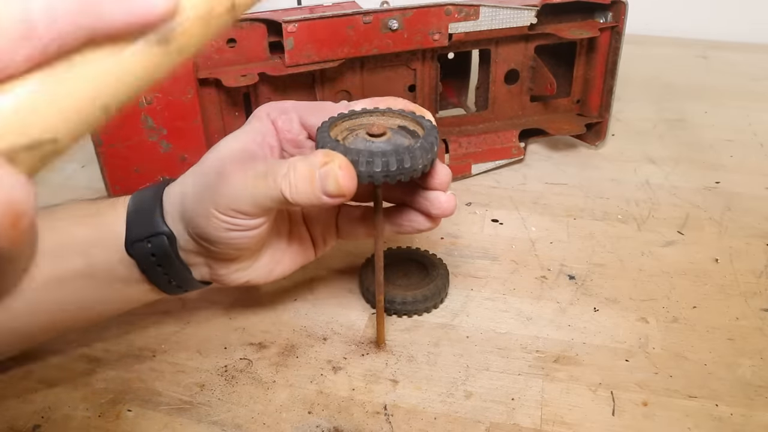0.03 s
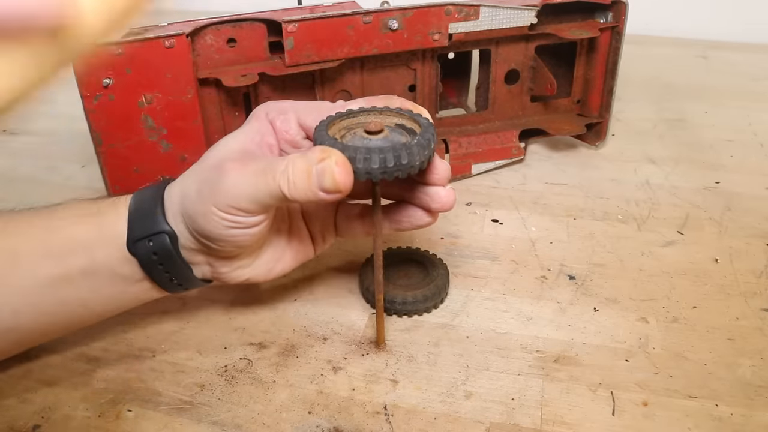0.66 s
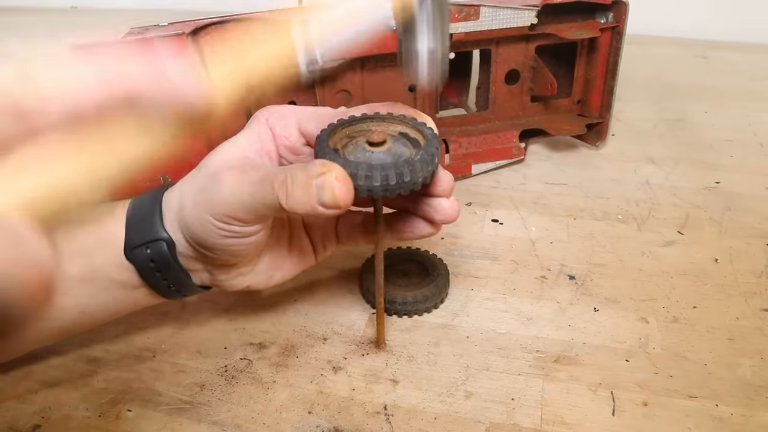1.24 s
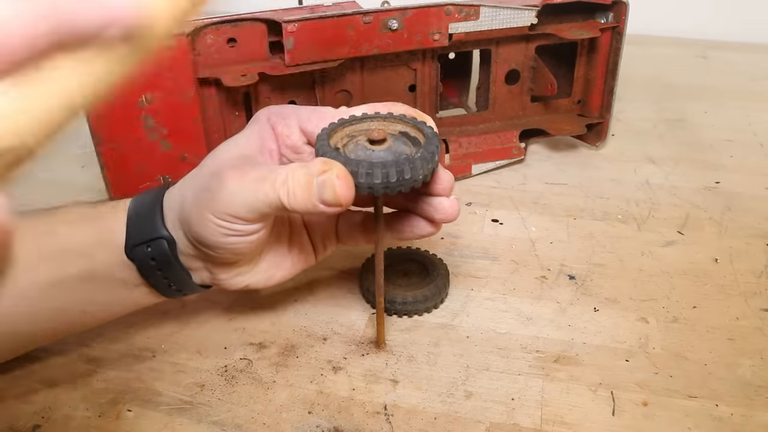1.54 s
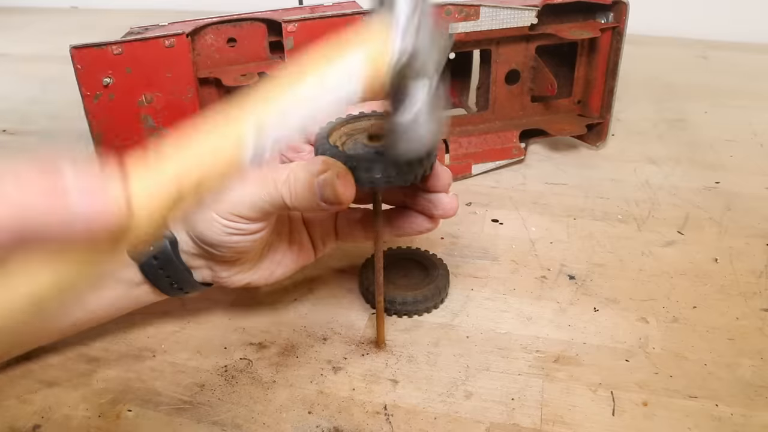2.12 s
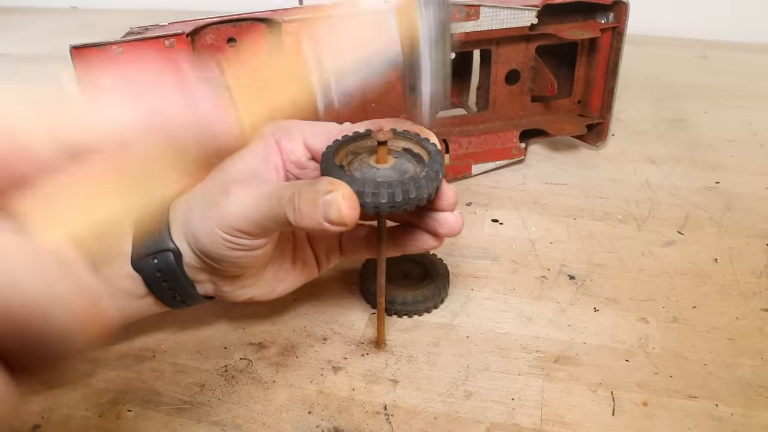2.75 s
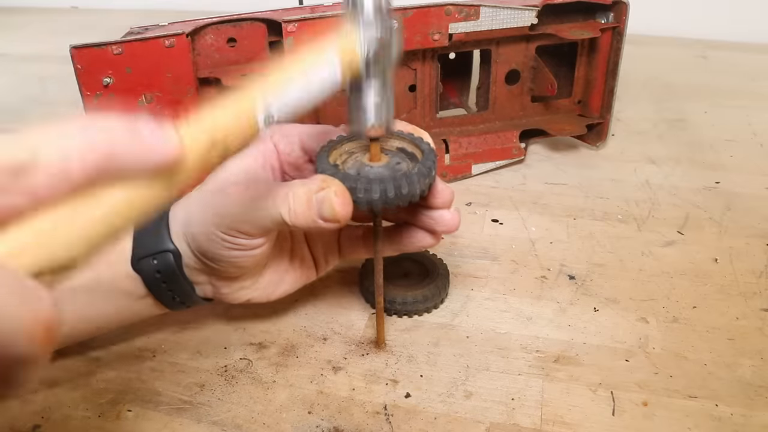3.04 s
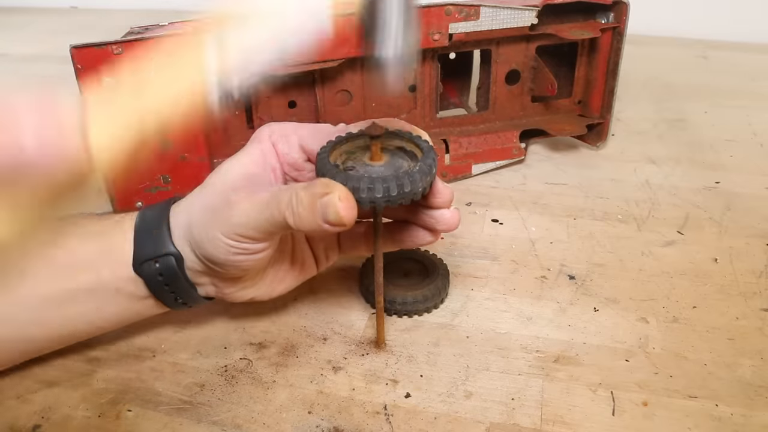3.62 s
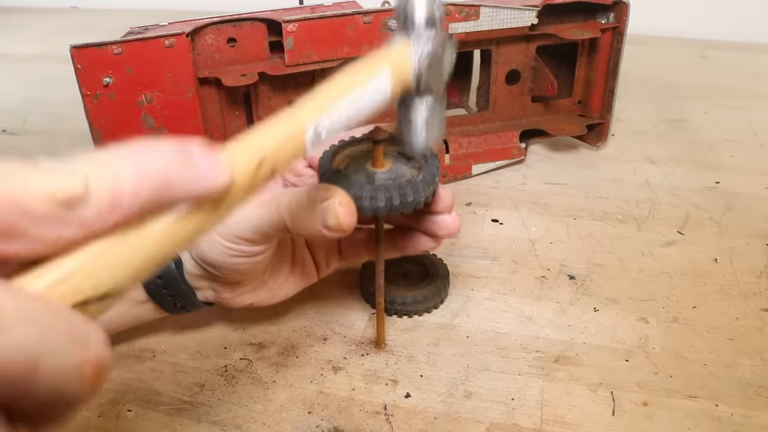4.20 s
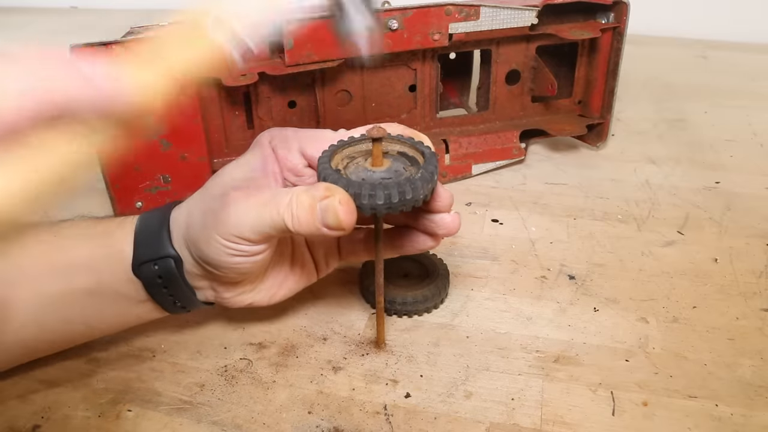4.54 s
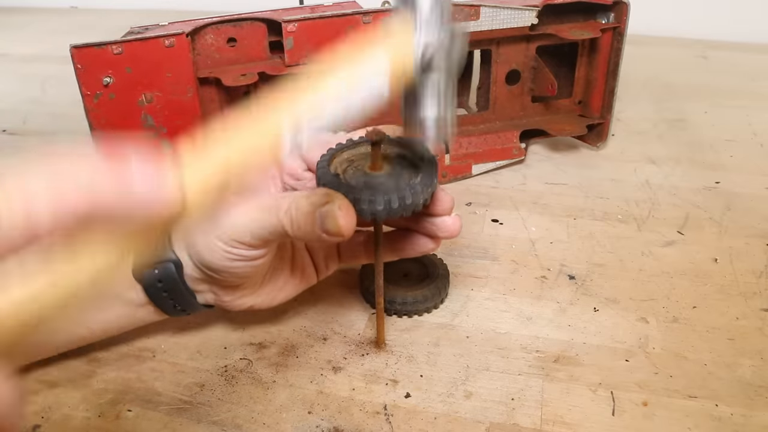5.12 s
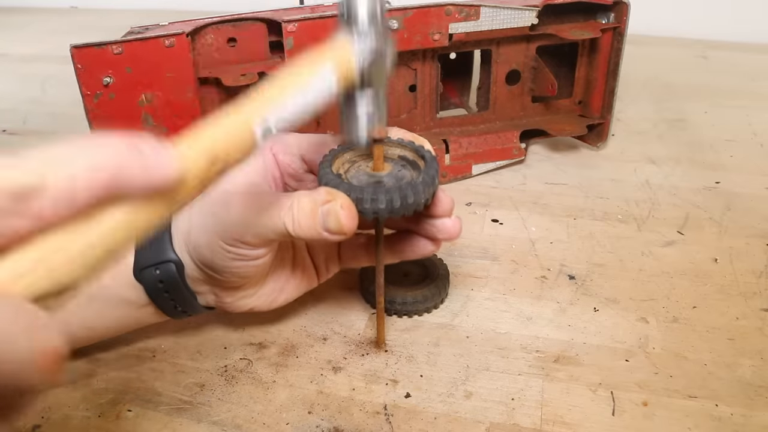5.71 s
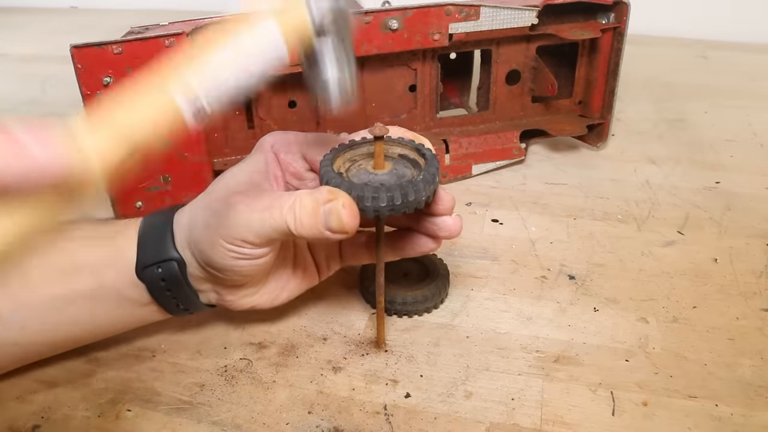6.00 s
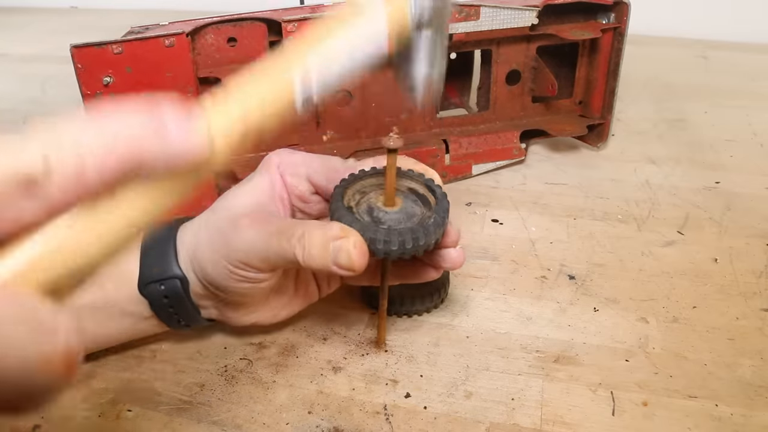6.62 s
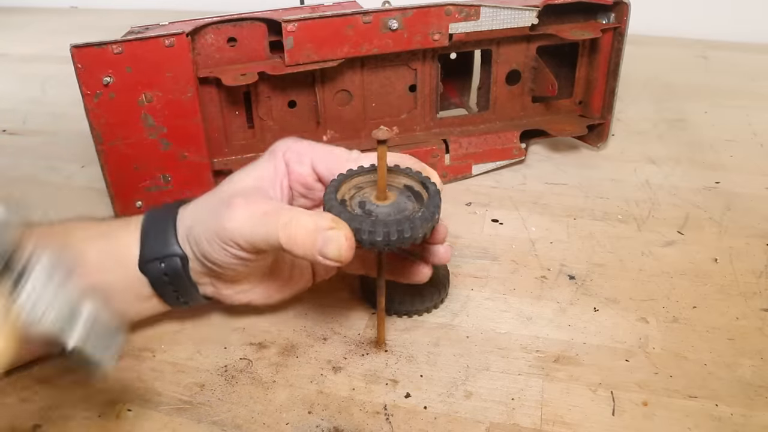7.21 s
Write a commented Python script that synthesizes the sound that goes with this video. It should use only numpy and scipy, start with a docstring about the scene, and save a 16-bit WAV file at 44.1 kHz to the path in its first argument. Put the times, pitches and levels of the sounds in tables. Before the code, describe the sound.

Quick, even hammer blows clack on a steel rod, each with a brief ring and a wooden knock in a small workshop.

```python
"""Steel clacks, about 4.5 a second: a small hammer taps a rusty axle through a hand-held toy wheel.
Each blow cracks on the rod's end, rings rod, wheel and hammer head, and knocks and sways the wooden
workbench under the axle. Strength, squareness and hardness of the contact set each blow's colour.
A small workshop answers over faint hiss; the two channels are almost unrelated."""
import sys
import numpy as np
from scipy import signal
from scipy.fft import rfft, irfft, next_fast_len
from scipy.io import wavfile
from scipy.ndimage import map_coordinates

SR = 44100
rng = np.random.default_rng(int(sys.argv[2]) if len(sys.argv) > 2 else 0)


def transcribe(signal):
    """Save signal, clipped to [-1, 1], as a 16-bit WAV file at the path in sys.argv[1]."""
    frames = np.atleast_2d(signal).T
    limited = np.clip(frames, -1, 1)
    pcm = np.round(limited * 32767).astype(np.int16)
    wavfile.write(sys.argv[1], SR, pcm)


N = 324135
LEAD = SR // 25  # samples before a blow's peak
T = (np.arange(2 ** 15) - LEAD) / SR  # one blow's time axis/s, peak at 0
GRID_HZ = np.arange(0, SR // 2, 40)

# Hammer blows: t/s, strength/dB, glance/dB (< 0 square, > 0 off-centre), contact hardness/dB
BLOWS = [(-0.095, -1, 3, 1.5), (0.1216, 1.5, -1, -1), (0.341, 0.7, -1.5, -1.5), (0.5602, 2, 1.5, -.5),
         (0.775, 2, 2, -1), (0.9924, .5, 2.5, -1.5), (1.1991, -0.4, 1, -3), (1.4166, -4, 4.5, -2),
         (1.6404, -1.5, 4.5, 4), (1.8745, -2.1, -0.5, -1.2), (2.11, 0, -1, -1), (2.325, 3.5, 0.5, -2),
         (2.5435, -0.2, 0, -3), (2.7903, -8.5, 2, -2.5), (3.04, -4, 5.5, 4.5), (3.2888, 0.6, -2, -0.9),
         (3.5411, 2, -3.5, -0.7), (3.7807, 1.46, -1, -3.3), (4.0022, -2.1, 4, -2.9),
         (4.2172, -2.5, 0.5, -1), (4.4426, -3.5, 0.5, 3), (4.6526, 0.5, -0.5, -1), (4.862, 0.66, -4, -3),
         (5.0761, 0.6, -2, -1.5), (5.284, -1.8, 2, -1.3), (5.4851, -3, 1, -1.5), (5.7132, -3.5, 3, 4),
         (5.9136, 1.4, -3.5, -1), (6.1153, .8, -3, -3), (6.3206, 0, -1, -1.8), (6.519, 2.2, 1.1, -1.5),
         (6.7762, -13.5, -3, 0)]


def hammering():
    """Each blow excites steel, bench and room; the contact colours all three."""
    track = np.zeros((2, N))
    walls = wall_noise()
    for t_s, strength_db, glance_db, hard_db in BLOWS:
        steel = axle(t_s, glance_db) + hammer_head(strength_db, glance_db, hard_db) + contact(hard_db)
        steel = hub_and_ping(steel, glance_db, hard_db, hub_share=0.81, ping_share=0.91)
        # the walls gather sound from all directions, evening out hub and ping
        room = hub_and_ping(workshop(walls), glance_db, hard_db, hub_share=0.55, ping_share=0.12)
        knock_db = knock_level_db(t_s, glance_db, hard_db)
        bench = bench_and_room() + hollow_knock(knock_db)
        blow = coloured(steel + bench + room, blow_colour(glance_db, knock_db))
        add(track, amp(strength_db) * chatter(blow), t_s)
    return track


# Modes of axle and wheel: f/Hz, level/dB, t60/s
AXLE_MODES = [(692, -25, 0.019), (813, -28, 0.014), (1018.5, -33, 0.11), (1163, -35, 0.11),
              (1305, -20.5, 0.032), (1509, -25.5, 0.035), (1770, -24, 0.019), (2065, -31.5, 0.017)]
# Clack growth as the rod's end comes free of the wheel: t/s, level/dB
FREE_END = [(0, -0.5), (2.8, 0.5), (3.2, 0.7), (6.5, 1.5)]


def axle(t_s, glance_db):
    """Rod and wheel clack, damped by the hand; a glancing blow puts less into them."""
    level_db = np.interp(t_s, *np.transpose(FREE_END)) - 0.45 * glance_db
    return amp(level_db) * ring(AXLE_MODES, rise_s=0.02, scatter_db=0.7, detune=0.012)


# Hammer head modes: f/Hz, level/dB, t60/s
HEAD_MODES = [(2160, -45, 0.024), (2860, -32.5, 0.024), (2922, -22.5, 0.0066), (4754, -41, 0.013),
              (6180, -27, 0.0073)]


def hammer_head(strength_db, glance_db, hard_db):
    """The head clinks more on hard or glancing contact and grows more slowly than the blow."""
    level_db = 1.04 - 0.23 * strength_db + 2.2 * hard_db + 0.2 * glance_db
    return amp(level_db) * ring(HEAD_MODES, rise_s=0.011, scatter_db=2.0, detune=0.0099)


# Steel-on-steel spectrum: f/Hz, level/dB
CRACK_SPECTRUM = [(60, -6), (300, -2), (1000, 2.5), (2500, 5), (3300, 3.5), (4000, -2.5), (5100, -9.5),
                  (6200, 0.5), (7700, -4.5), (8600, -3.5), (11300, -11.5), (12800, -20.5), (14700, -22),
                  (16000, -41)]


def contact(hard_db):
    """The hammer face cracks on the rod's end amid a weaker rattle; harder is brighter."""
    crack = amp(-22) * envelope(T, rise_s=0.021, t60_s=0.0083)
    rattle = amp(-32) * envelope(T, rise_s=0.041, t60_s=0.043)
    burst = (crack + rattle) * noise(CRACK_SPECTRUM, len(T)) * pan(right_db=1.5)
    return coloured(burst, [(1500, 0.0015), (2600, hard_db)])


def hub_and_ping(x, glance_db, hard_db, hub_share, ping_share):
    """An off-centre blow favours the ring of the wheel's hub, a hard one the ping of the rod's end."""
    hub = bell_curve(centre_hz=2080, lift_db=hub_share * 1.4 * glance_db, rel_width=0.084)
    ping = bell_curve(centre_hz=4510, lift_db=ping_share * (4 + hard_db), rel_width=0.11)
    return coloured(coloured(x, hub), ping)


def blow_colour(glance_db, knock_db):
    """A square blow favours the middle; a glancing one, thud, clang and click. Returns f/Hz, level/dB."""
    thud_db = 0.13 + 0.68 * glance_db
    clang_db, click_db = 0.85 * glance_db, glance_db
    return [(220, thud_db), (380, knock_db), (700, knock_db), (950, 0.0068), (1900, 0),
            (2500, clang_db), (3800, clang_db), (5200, click_db)]


def chatter(x, spacing_hz=259.1):
    """Tiny rebounds within one contact ripple the treble, differently for each blow."""
    ripple = map_coordinates(rng.standard_normal(256), [GRID_HZ / spacing_hz], mode="wrap")
    depth_db = 4.0 * along([(600, 0.16), (3000, 0.21), (7000, 0.95)], GRID_HZ)
    return coloured(x, np.column_stack([GRID_HZ, depth_db * ripple]))


# Modes of the bench top and of the workshop: f/Hz, level/dB, t60/s
BENCH_AND_ROOM_MODES = [(37.56, -42, 0.37), (49.4, -49.5, 0.33), (81.5, -45.5, 0.25), (136.2, -47, 0.38),
                        (159, -30.5, 0.046), (262, -45, 0.17), (1040, -47, 0.099), (1610, -47, 0.41),
                        (1990, -46.5, 0.15), (2190, -40, 0.1)]


def bench_and_room():
    """The wooden top and the workshop's own modes answer the blow at once."""
    return ring(BENCH_AND_ROOM_MODES, rise_s=0.0013, scatter_db=3.65, detune=0.01)


# Hollow modes of the bench and the toy truck's body on it: f/Hz, level/dB, t60/s
HOLLOW_MODES = [(319, -42.5, .35), (353.8, -42.5, 0.19), (474, -42.5, 0.33), (518.2, -28.5, 0.058),
                (531.4, -39.5, 0.33), (619, -42.5, 0.37)]


def hollow_knock(knock_db, travel_s=0.01092):
    """Bench and toy body peak later, once the push has spread."""
    knock = amp(1.3 * knock_db) * ring(HOLLOW_MODES, rise_s=0.02, scatter_db=1.0, detune=0.008)
    return np.roll(knock, round(travel_s * SR), axis=1)


# Hollow knock trend, strongest early on: t/s, level/dB
KNOCK_TREND = [(0.1, -1.2), (0.7, 4), (1.2, 2.3), (1.9, 3.5), (2.4, -1.5), (3.5, 0.45), (4.6, -0.5),
               (5.5, -0.2), (6.8, 0.5)]


def knock_level_db(t_s, glance_db, hard_db):
    """Square, hard blows wake the hollow knock."""
    return np.interp(t_s, *np.transpose(KNOCK_TREND)) - 0.45 * glance_db + 0.47 * hard_db


# Wall echo spectrum: f/Hz, level/dB
ROOM_SPECTRUM = [(30, -1.5), (85, 0), (140, -1), (210, 0), (520, 5.5), (900, 1), (2000, 6.5), (2350, -5),
                 (3100, -5.5), (5100, -18.5), (6200, -13.5), (9200, -20), (12800, -31.5), (14600, -36.5),
                 (16000, -50.5)]


def wall_noise():
    """Dense echoes as steady noise, one blow long."""
    return noise(ROOM_SPECTRUM, len(T))


# Workshop decay: f/Hz, t60/s
ROOM_T60 = [(60, 0.083), (160, .38), (500, 0.43), (1800, 0.37), (3000, 0.37), (7500, 0.26), (13000, 0.19)]


def workshop(walls, sameness=0.55):
    """The walls answer each blow partly alike, as the rod hardly moves; the middle rings longest."""
    echoes = np.sqrt(sameness) * walls + np.sqrt(1 - sameness) * wall_noise()
    hz, frame_s, spectra = signal.stft(echoes, SR, nperseg=256)
    age_s = np.maximum(frame_s - LEAD / SR, 0)
    decay = amp(-60 * age_s / along(ROOM_T60, hz)[:, None])
    tail = signal.istft(spectra * decay, SR, nperseg=256)[1][:, :len(T)]
    build_up = np.clip(T / 0.00069, 0, 1)
    return amp(-29.5) * build_up * tail * pan(right_db=0.5)


# Noise floor spectrum: f/Hz, level/dB
FLOOR_SPECTRUM = [(15, -22.5), (25, 0.5), (290, -0.5), (322, -0.5), (480, -9.5), (534, -9), (661, -10.5),
                  (1290, -10.5), (4620, -25), (8740, -23), (14500, -33)]


def noise_floor():
    """Still air and microphone hiss."""
    return amp(-73.5) * noise(FLOOR_SPECTRUM, N)


def ring(modes, rise_s, scatter_db, detune):
    """Struck modes; grip and point of contact vary their level and pitch from blow to blow."""
    out = np.zeros((2, len(T)))
    for hz, db, t60_s in modes:
        t = T[:LEAD + int(2 * t60_s * SR)]
        pitch_hz = hz * (1 + detune * rng.standard_normal())
        phase = rng.uniform(0, 2 * np.pi, (2, 1))
        gain = amp(db + scatter_db * rng.standard_normal())
        out[:, :len(t)] += gain * envelope(t, rise_s, t60_s) * np.sin(2 * np.pi * pitch_hz * t + phase)
    return out


def envelope(t, rise_s, t60_s):
    """Up 60 dB in rise_s to the peak at t = 0, then down 60 dB in t60_s."""
    return amp(60 * np.minimum(t / rise_s, -t / t60_s))


def amp(db):
    """Decibels to gain."""
    return 10 ** (np.asarray(db) / 20)


def pan(right_db):
    """Stereo gains: left down, right up by right_db."""
    return amp([[-right_db], [right_db]])


def along(points, hz):
    """(f/Hz, value) points interpolated on a log axis."""
    point_hz, values = np.transpose(points)
    return np.interp(np.log(hz + 1), np.log(point_hz + 1), values)


def bell_curve(centre_hz, lift_db, rel_width):
    """Gaussian peak or dip as (f/Hz, level/dB) points."""
    offset = (GRID_HZ - centre_hz) / (rel_width * centre_hz)
    return np.column_stack([GRID_HZ, lift_db * np.exp(-0.5 * offset ** 2)])


def coloured(x, points):
    """x filtered by (f/Hz, level/dB) points."""
    size = x.shape[-1]
    return irfft(rfft(x) * amp(along(points, np.fft.rfftfreq(size, 1 / SR))), size)


def noise(spectrum, size):
    """Two unrelated channels of coloured noise, rms 1."""
    x = coloured(rng.standard_normal((2, size)), spectrum)
    return x / np.sqrt(np.mean(x ** 2) + 1e-20)


def add(track, blow, peak_s):
    """Mixes a blow into the track, peaking at peak_s."""
    start = round(peak_s * SR) - LEAD
    first, end = max(start, 0), min(start + len(T), N)
    track[:, first:end] += blow[:, first - start:end - start]


def scene():
    """Hammering over the quiet of the workshop."""
    return hammering() + noise_floor()


def record(dry):
    """Brick-wall low-pass."""
    top_hz = 15870
    size = next_fast_len(N + SR // 2)
    passband = np.fft.rfftfreq(size, 1 / SR) < top_hz
    return irfft(rfft(dry, size) * passband, size)[:, :N]


dry = scene()
out = record(dry)
transcribe(out)
```